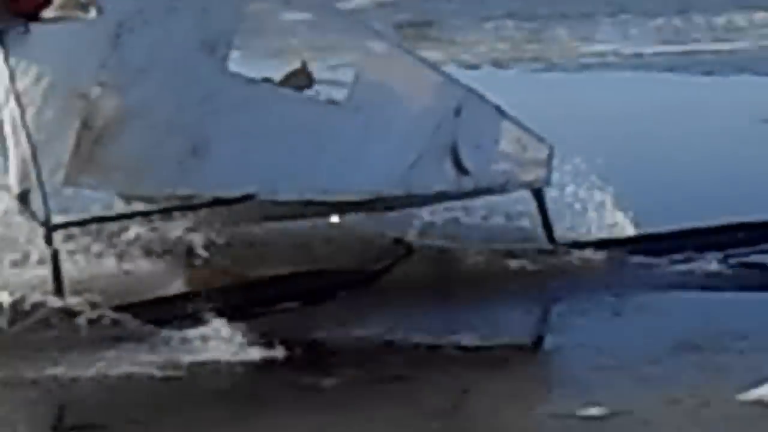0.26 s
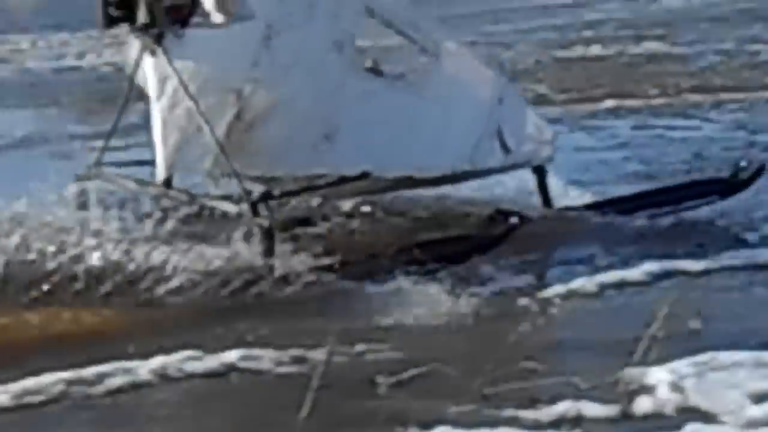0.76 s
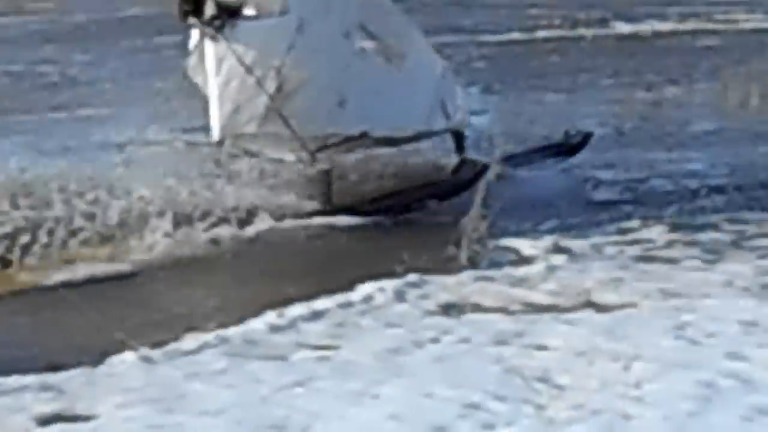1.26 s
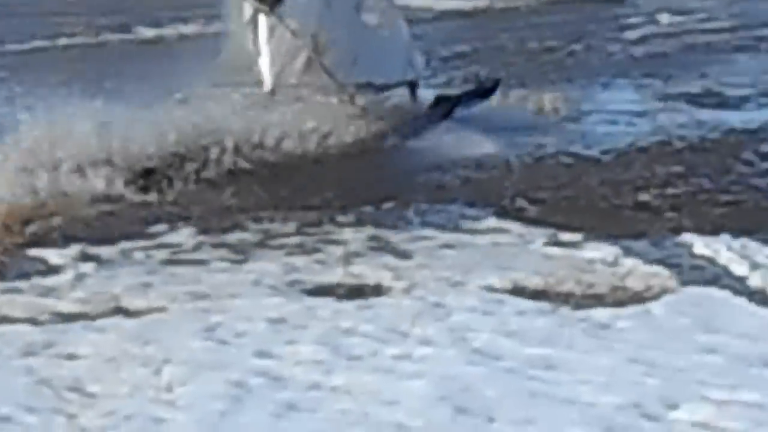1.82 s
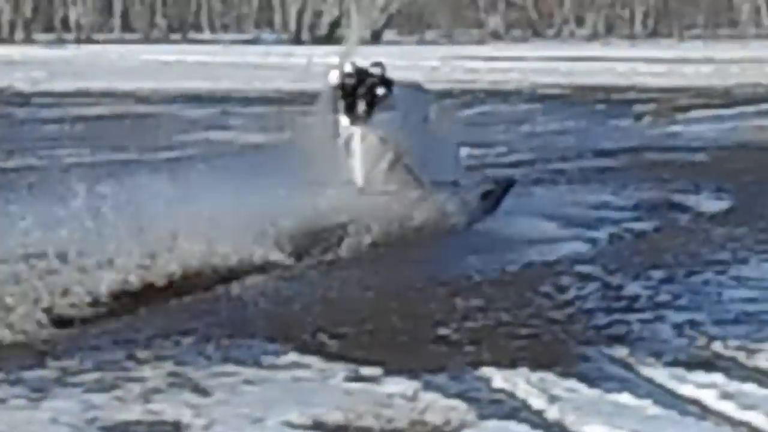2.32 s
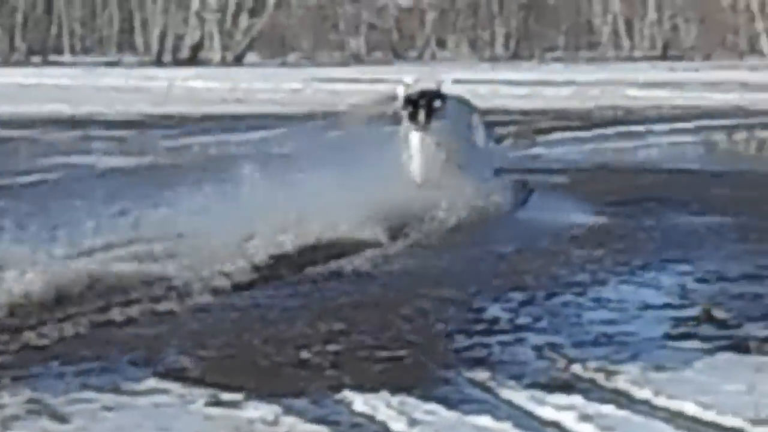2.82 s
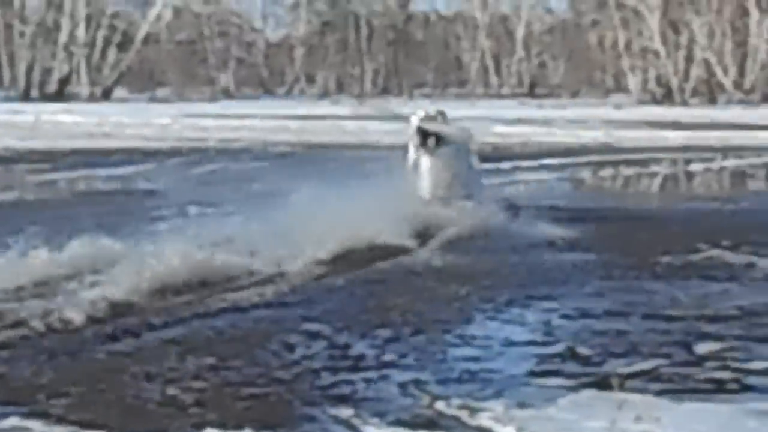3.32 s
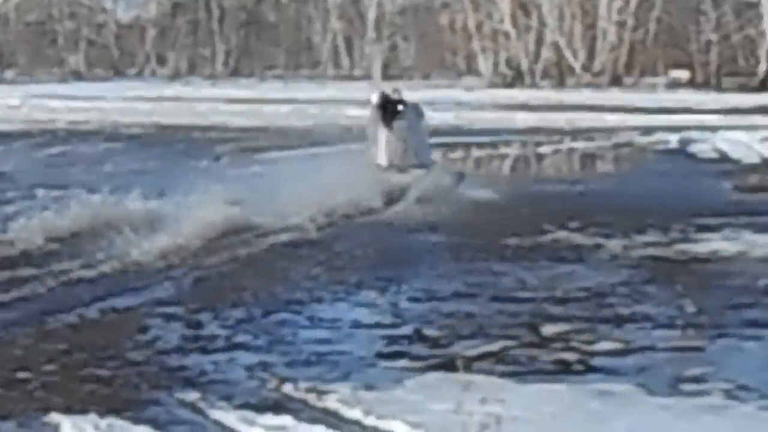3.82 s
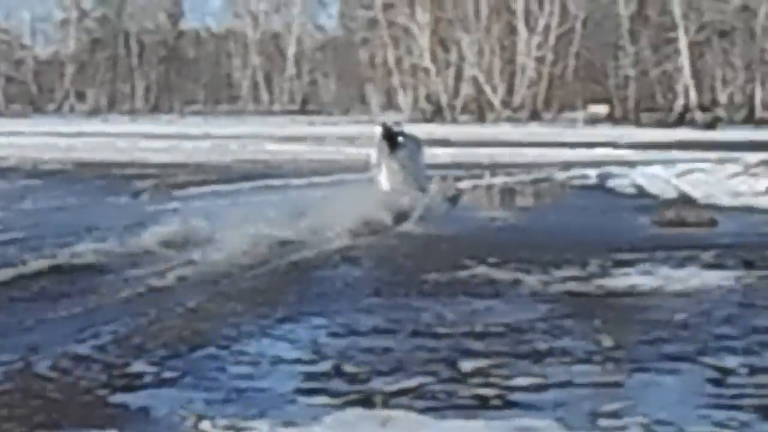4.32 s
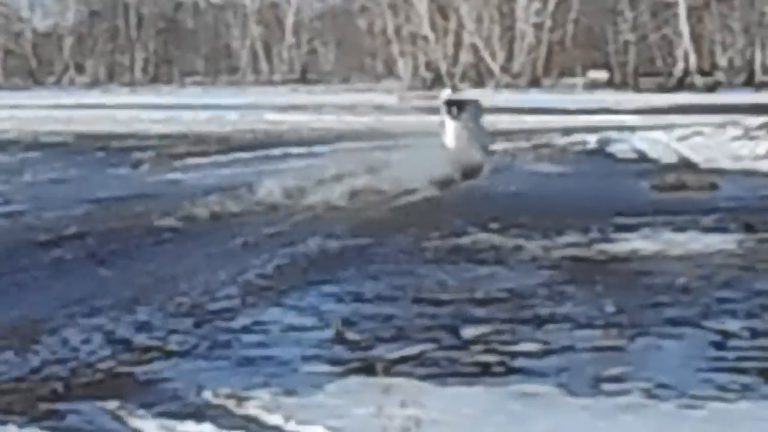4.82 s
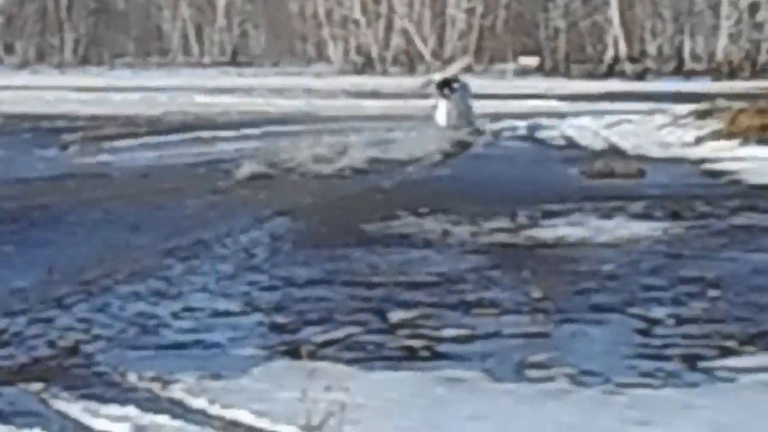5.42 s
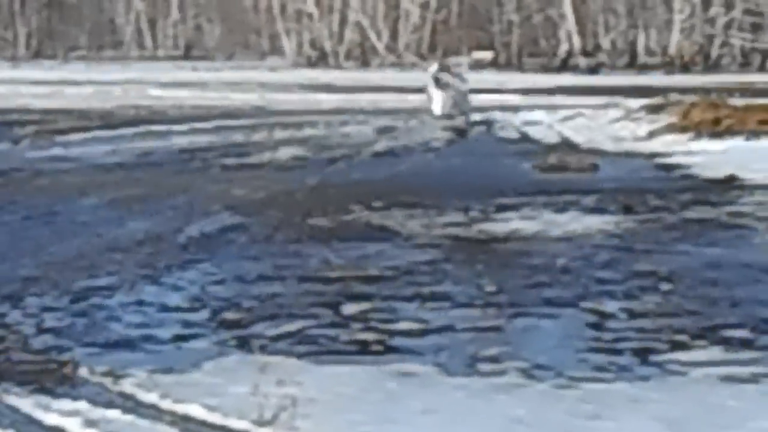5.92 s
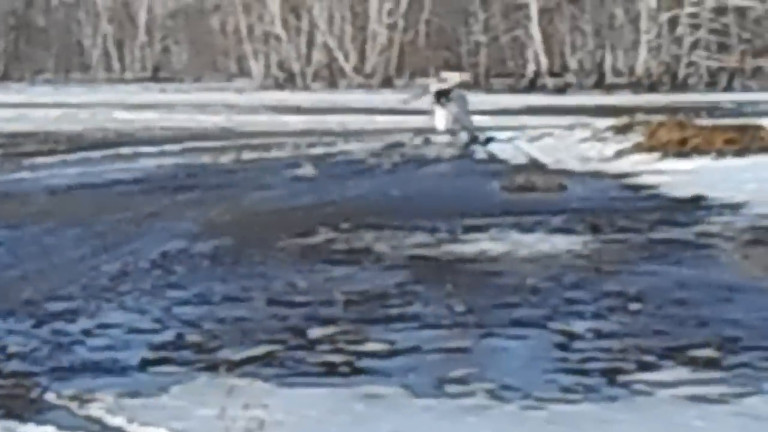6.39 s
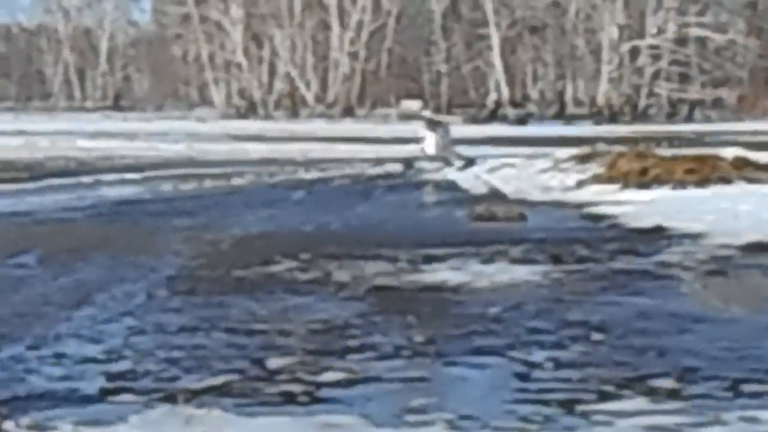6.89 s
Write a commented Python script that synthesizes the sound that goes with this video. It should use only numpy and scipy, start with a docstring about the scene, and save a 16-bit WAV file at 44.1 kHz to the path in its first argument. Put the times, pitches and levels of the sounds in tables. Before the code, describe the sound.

Outdoors on open wet ice, a propeller sled passes close and recedes. Its small unmuffled engine fires in a fast, steady, raspy rattle over faint spray hiss. After about four seconds the throttle closes, the pulses slow, sharp pops crack out, a half-second burst barks, then airy chuffs and propeller wash continue with a few late pops. Fixed microphone near the shore, nearly centred sound.

```python
"""Propeller sled leaving over wet ice

A small four-stroke engine with an open exhaust drives the sled: each firing is a crack, a jet hiss and a thud.
It fires evenly, is throttled back with scattered pops and one more burst, then coasts, chuffing, with a
few late pops. Shaped noise makes the propeller wash and the spray underneath. A delayed copy of the sled,
the echo from the ground, adds notches that sweep upward as the sled recedes."""
import sys
import numpy as np
from scipy import signal
from scipy.io import wavfile
from scipy.ndimage import uniform_filter1d

SR = 44100
rng = np.random.default_rng(int(sys.argv[2]) if len(sys.argv) > 2 else 0)


def unload_audio(sound):
    """Save the sound as a 16-bit wav file, at the path given as the first command line argument."""
    columns = np.transpose(np.atleast_2d(sound))
    # keep every value between -1 and 1, then stretch to whole-number steps
    steps = np.round(np.clip(columns, -1, 1) * 32767)
    wavfile.write(sys.argv[1], SR, steps.astype(np.int16))


N = 315315
T = np.arange(N) / SR  # time in seconds

# Engine speed; one cycle is two crank turns. Each row: time in seconds, cycles per second.
SPEED = [(0.0, 32.37), (0.28, 32.3), (0.74, 31.7), (2.73, 31.16), (3.74, 31.12), (3.96, 30.65),
         (4.49, 22.54), (5.11, 17.13), (5.4, 19.27), (5.55, 21.96), (5.65, 22.01), (6.17, 18.28),
         (6.94, 15.34), (7.15, 14.25)]
# Background level over time, shared by wash, spray and chuffs. Each row: time in seconds, level in dB.
BACKGROUND_LEVEL = [(0.0, -37), (1.79, -49), (2.25, -43), (2.93, -41.5), (4.16, -36), (4.36, -32.5),
                    (5.14, -27), (5.38, -30), (5.55, -36), (5.77, -32.5), (6.27, -23.5), (6.57, -22),
                    (7.15, -23)]
BURST_START_S, BURST_END_S = 5.18, 5.77  # every cycle fires again between these times


def gain_of(db):
    """Turn decibels into a factor on the wave."""
    return 10 ** (np.asarray(db) / 20)


def evened(x):
    """Scale a signal to an average (RMS) strength of one."""
    return x / np.sqrt(np.mean(x ** 2) + 1e-20)


def read(points, hz):
    """Read a frequency curve between its points, on a logarithmic frequency scale."""
    f, value = np.transpose(points)
    return np.interp(np.log(hz + 1), np.log(f + 1), value)


def columns(rows, t):
    """Read every column of a time table at the times t."""
    s, *values = np.transpose(rows)
    return [np.interp(t, s, v) for v in values]


def coloured(x, points):
    """Filter with a gain curve; it never acts ahead of time, as its phase follows from the log gain."""
    hz = abs(np.fft.fftfreq(8192, 1 / SR))
    log_gain = read(points, hz) * np.log(10) / 20
    response = np.exp(np.conj(signal.hilbert(log_gain)))
    taps = np.fft.ifft(response).real[:4096]
    return signal.oaconvolve(x, taps)[:N]


def train(s, db, shape):
    """Place one copy of a shape at every time s, each at its own level."""
    clicks = np.zeros(N)
    places = np.clip((s * SR).astype(int), 0, N - 1)
    clicks[places] = gain_of(db)
    return signal.oaconvolve(clicks, shape)[:N]


def patchy(frames_wide, bins_wide, patch_db):
    """Noise whose level is lumpy over time (frames of 64 samples) and frequency (129 bins)."""
    a, b, patches = rng.standard_normal((N // 64 + 5, 129, 3)).T
    patches = uniform_filter1d(patches, bins_wide, 0)
    patches = evened(uniform_filter1d(patches, frames_wide, 1))
    spectrum = (a + 1j * b) * gain_of(patch_db * patches)
    return signal.istft(spectrum, nperseg=256, noverlap=192)[1][:N]


def cycles():
    """Add up the speed into a position in engine cycles; the exhaust valve opens at each whole number."""
    start_cycle = .509
    turns = start_cycle + np.cumsum(columns(SPEED, T)[0]) / SR
    opens = T[1:][np.diff(np.floor(turns)) > 0]
    return turns, opens


def in_burst(s):
    """True while the engine fires its late burst."""
    return (s > BURST_START_S) & (s < BURST_END_S)


def firings(opens):
    """Time and levels of every firing: crack, treble, thud, deep push, and tail against the crack."""
    # Even firing. Each row: time in seconds, then crack, treble and thud levels in dB.
    burn = [(0, -19, -9, -25.5), (.75, -21.5, -10, -27.5), (1.9, -21, -14.5, -28), (2.6, -17.5, -12.5, -25),
            (3.2, -18.5, -15, -23.5), (3.9, -14.5, -16.5, -20.5), (4.05, -16.5, -23, -26.5),
            (4.19, -26.5, -47, -26)]
    # Changes to single even firings, nearly all harder. Each row: time in seconds, extra crack in dB.
    hard = [(1.713, 2.5), (2.065, 2.5), (2.097, 7), (2.128, 4), (2.223, -1.5), (2.896, 1.5), (3.153, 2),
            (3.281, 6.5), (3.667, 5.5), (3.7, 3), (3.731, 3.5), (3.763, 2.5), (3.796, 2), (3.828, 3.5),
            (3.991, 0.5)]
    # Single firings after the throttle closes.
    # Each row: time in seconds, crack level in dB, then treble and thud in dB against that crack.
    pops_table = [(4.201, -11, -17, -2), (4.3954, -15, -25, -2), (4.4391, -6, -15, -2.5),
                  (4.5724, -9.5, -12, 0), (4.8137, -10.5, -6, 0.5), (4.921, -22.5, -7, -6),
                  (5.026, -19, -4, 3.5), (5.0841, 0.5, -8, -35), (5.151, -12, -20, -20),
                  (5.1955, -20, 2.5, -3), (5.2548, 2, 1, -13), (5.3086, 3, 4.5, -16), (5.3621, -3, -4, -21),
                  (5.4148, -3.5, -3.5, -31), (5.4632, -5, -6.5, -13), (5.513, -6, -4, -11.5),
                  (5.5582, -7.5, -5.5, -14), (5.6024, -13, -4, -11), (5.649, -19.5, -7.5, -8),
                  (5.6955, -19, -13, -6), (5.742, -27, -2, 0), (6.4224, -14, -11, 1),
                  (6.4782, -12, -13.5, -8), (6.5396, -15, -7, -10), (6.597, -11.5, -9.5, -0.5),
                  (6.782, -11, -21, 4), (7.043, -14, -7, -18)]
    throttle_off_s = 4.19
    stray_push_db, burst_push_db, pop_tail_db = -20.5, -12.5, -13  # against the crack of a pop

    even = opens[opens < throttle_off_s]
    chance = rng.standard_normal((len(even), 5))  # no two charges burn alike
    crack_db, treble_db, thud_db = columns(burn, even)
    hard_s, extra_db = np.transpose(hard)
    nearest = abs(even[:, None] - hard_s).argmin(axis=0)
    crack_db[nearest] += extra_db
    steady = [even + 0.00011 * chance[:, 0],
              crack_db + 1.0 * chance[:, 1],
              treble_db + 0.84 * chance[:, 2],
              thud_db + 0.99 * chance[:, 3],
              thud_db - 5.5,
              -10 + 1.14 * chance[:, 4]]

    s, pop_db, treble_db, thud_db = np.transpose(pops_table)
    push_db = np.where(in_burst(s), burst_push_db, stray_push_db)
    pops = [s, pop_db, pop_db + treble_db, pop_db + thud_db, pop_db + push_db, pop_tail_db + 0 * s]
    return np.hstack([steady, pops])


def exhaust(opens):
    """Each firing: a shock and a burst of jet noise over a low pressure thud in the pipe."""
    # Colour of the crack. Each row: frequency in Hz, level per Hz in dB.
    crack_colour = [(100, -62), (350, -15.5), (700, -9), (1200, -9.5), (2000, -5.5), (2900, -7), (4300, -1),
                    (6300, -0.5), (9000, -10), (16000, -16)]
    # Tones at which the exhaust pipe rings. Each row: frequency in Hz, level in dB, time to fade by 60 dB in s.
    pipe_modes = [(188, -11.5, 0.061), (299, -2.5, 0.013), (559, -16.5, 0.12)]
    # An open pipe radiates little deep bass. Each row: frequency in Hz, gain in dB.
    open_end = [(25, -10), (90, -2.5), (16000, -3)]

    s, crack_db, treble_db, thud_db, push_db, tail_db = firings(opens)
    t = T[:3000] - .008  # each shape starts 8 ms ahead of its zero time
    snap = np.exp(-(t / .0013) ** 2)  # the blast leaves the pipe
    swell = gain_of(5 + 5800 * t)  # a short hiss swells just before the blast
    fade = gain_of(-60 * t / 0.045) + gain_of(-26.0 - 60 * t / 0.033)
    onset = np.clip(.4 + 300 * (t + .001), 0, 1)
    tail = np.where(t < -.001, swell, fade * onset)

    jet = coloured(patchy(8, 4, patch_db=3.5), crack_colour)
    shock = coloured(signal.unit_impulse(1000), crack_colour)[:1000]
    crack = 0
    # below and above 2900 Hz the levels are set apart
    for side, db in ("low", crack_db), ("high", treble_db):
        band = signal.butter(4, 2900, side, fs=SR, output="sos")
        noise = evened(signal.sosfilt(band, jet))
        click = signal.sosfilt(band, shock)
        blasts = train(s - .0068, db - 13.0, snap)
        tails = train(s - .0072, db + tail_db, tail)
        crack += noise * (blasts + tails)
        crack += train(s + .0006, db - 4, click / abs(click).max())

    front = -1.2 * np.exp(-(t / 0.00026) ** 2)  # the pressure step at the pipe mouth
    push = np.exp(-((t - .0022) / 0.0011) ** 2)  # the slug of gas behind it
    ring = 0
    for hz, db, t60 in pipe_modes:
        ring = ring + gain_of(db - 60 * t / t60) * np.sin(2 * np.pi * hz * t)
    ring = ring * (t > 0)
    thud = train(s - .0083, thud_db, front + ring) + train(s - .0083, push_db, push)
    return crack + bark(s, crack_db) + coloured(thud, open_end)


def bark(s, crack_db):
    """The pipe mouth rings briefly at each blast, its pitch a little different at each firing."""
    pitch_hz, pitch_spread = 1947, 0.068  # the spread is a share of the pitch
    t60_s, level_db = .015, -5  # time to fade by 60 dB; level against the crack
    out, t = np.zeros(N + 1500), T[:1500]
    chance = rng.standard_normal((len(s), 2))
    for at, db, (a, b) in zip(s, crack_db, chance):
        rise = 1 - np.exp(-(t / .0016) ** 2)
        shape = rise * gain_of(db + level_db + 1.3 * b - 60 * t / t60_s)
        hz = pitch_hz * (1 + pitch_spread * a)
        start = round((at - .0008) * SR)
        out[start:][:1500] += shape * np.sin(2 * np.pi * hz * t)
    return out[:N]


def by_throttle(shut, opened):
    """A quantity that moves between its shut and open values with the throttle."""
    # Throttle opening. Each row: time in seconds, opening from 0 (shut) to 1 (open).
    throttle = [(0, 1), (3.6, 0.97), (4, .7), (4.2, 0.2), (5.28, 0.24), (5.5, 0.77), (5.7, 0), (7.15, 0.07)]
    return shut + (opened - shut) * np.clip(columns(throttle, T)[0], 0, 1)


def wash(turns):
    """Propeller wash: patchy noise that turns duller as the throttle shuts and throbs with the engine."""
    # The clearer and the duller colour of the wash. Each row of both: frequency in Hz, level per Hz in dB.
    near_colour = [(30, -8.5), (190, 7.5), (390, -6.5), (620, 10.5), (1400, -31), (3000, 10.5),
                   (6300, -3.5), (16000, -40)]
    dull_colour = [(30, -6.5), (200, -15.5), (485, -3.5), (800, 2), (1150, 1.5), (1500, -7.5), (2300, -9.5),
                   (3000, -18), (4200, -39), (6300, -21.5), (16000, -75)]
    dull_shut, dull_open = 0.67, 0.47  # share of the dull colour with the throttle shut and open

    noise = patchy(14, 3, patch_db=2.0)
    near = evened(coloured(noise, near_colour))
    dull = evened(coloured(noise, dull_colour))
    level_db = columns(BACKGROUND_LEVEL, T)[0]
    share = np.clip(by_throttle(dull_shut, dull_open), 0, 1)
    # louder at the start of each cycle, then sinking; the jump is smoothed
    throb_db = uniform_filter1d(8.26 * np.exp(-(turns % 1) / 0.73), 100)
    return gain_of(level_db + throb_db - 4) * ((1 - share) * near + share * dull)


def spray():
    """Lumpy hiss of flung water over a low rumble of air, strong under power."""
    # Colour of hiss and rumble together. Each row: frequency in Hz, level per Hz in dB.
    spray_colour = [(25, 6), (60, 7), (120, 8), (1000, -2.5), (4000, -34), (8000, 3), (16000, -3)]
    shut_db, open_db = -25.5, -1  # against the background level with the throttle shut and open
    noise = evened(coloured(patchy(20, 6, patch_db=4.5), spray_colour))
    level_db = columns(BACKGROUND_LEVEL, T)[0] + by_throttle(shut_db, open_db)
    return gain_of(level_db) * noise


def pump_db(s):
    """Level of each chuff in dB: slower pumping stands out more; chuffs are much weaker during the late burst."""
    above_background_db, db_per_speed, burst_db = 27, -1.273, -18  # the second: dB for each cycle per second
    level_db = columns(BACKGROUND_LEVEL, s)[0] + above_background_db
    return level_db + db_per_speed * columns(SPEED, s)[0] + burst_db * in_burst(s)


def chuffs(opens):
    """The rising piston shrinks the cylinder, so the pumped air rings upward in pitch."""
    # Colour of the hiss of pumped air. Each row: frequency in Hz, level per Hz in dB.
    puff_colour = [(300, -14), (1000, 12.5), (2000, -6), (4500, -4), (9000, -30), (16000, -36)]
    pump_from_s = 4.1
    out, t = np.zeros(N + 2000), T[:2000]
    chance = rng.standard_normal((len(opens), 3))
    for s, (a, b, c) in zip(opens, chance):
        hz = (240 + 36000 * t) * (1 + .04 * a)
        rise = 1 - np.exp(-t / .001)
        shape = rise * np.exp(-(t / (.012 + .001 * c)) ** 4)
        level = gain_of(pump_db(s) + 1.2 * b) * (s > pump_from_s)
        tone = np.sin(2 * np.pi * np.cumsum(hz) / SR)
        out[round(s * SR):][:2000] -= level * shape * tone

    late = opens[opens > pump_from_s]
    puff_db = pump_db(late) - 7 + 2.0 * rng.standard_normal(len(late))
    puffs = train(late, puff_db, gain_of(-60 * t / 0.047))
    hiss = puffs * evened(coloured(rng.standard_normal(N), puff_colour))  # the first rush past the valve
    no_deep_bass = [(30, -31.5), (150, 3.5), (16000, -13.5)]  # frequency in Hz, gain in dB
    return coloured(out, no_deep_bass) + hiss


def ground_echo(sled):
    """Sound bounced off the ice arrives late by its detour, which shrinks as the distance grows."""
    # Distance to the sled. Each row: time in seconds, distance in metres.
    distance = [(0, 10.15), (.7, 9.56), (1.3, 11.3), (1.9, 13.6), (2.5, 18.5), (3.2, 24.5), (4.3, 31.9),
                (7.15, 37.2)]
    pipe_m, ear_m, sound_m_per_s = 1.5, 1.5, 343  # heights above the ice, speed of sound
    late_s = 2 * pipe_m * ear_m / (sound_m_per_s * columns(distance, T)[0])
    echo = np.interp(T - late_s, T, sled)
    scattered = [(100, -7), (2000, -7.0), (7000, -20.5)]  # frequency in Hz, gain in dB
    return coloured(echo, scattered)  # rough wet ice scatters the treble


def scene():
    """Engine and wash with their ground echo, plus spray, the same in both channels."""
    turns, opens = cycles()
    sled = exhaust(opens) + chuffs(opens) + wash(turns)
    heard = sled + ground_echo(sled) + spray()
    return np.array([heard, heard])


def record(dry):
    """Overall colour with a dark band near 11 kHz, soft overload, a treble unlike left and right, band limit."""
    # Overall colour, with a dark band near 11 kHz. Each row: frequency in Hz, gain in dB.
    overall_colour = [(20, -8), (100, -2.5), (1400, -2.5), (2050, 3.5), (2400, -0.5), (2850, -12),
                      (3600, -5), (9000, -7.5), (9900, -18), (10500, -35), (11500, -45), (12100, -15),
                      (13000, -9), (16000, -6)]
    # Left-right difference against the sum, ahead of a 2 dB lift. Each row: frequency in Hz, gain in dB.
    side_colour = [(60, -72), (110, -74), (200, -76), (380, -69), (700, -34), (1290, -27), (2380, -24),
                   (4400, -17), (8120, -11), (15000, -5)]
    edge_hz = 16000

    mid = 1.1 * np.tanh(coloured(dry.mean(0), overall_colour) / 1.1)
    # random phases give a signal with a similar spectrum but another wave
    z = signal.stft(mid, nperseg=128)[2]
    random_phase = np.exp(2j * np.pi * rng.random(z.shape[::-1]).T)
    unlike = signal.istft(z * random_phase, nperseg=128)[1]
    side = coloured(unlike, side_colour) * gain_of(2.0)
    both = np.array([mid + side, mid - side])
    low_pass = signal.firwin(511, edge_hz, window=("kaiser", 9), fs=SR)
    return signal.oaconvolve(both, low_pass[None], "same")


dry = scene()
out = record(dry)
unload_audio(out)
```